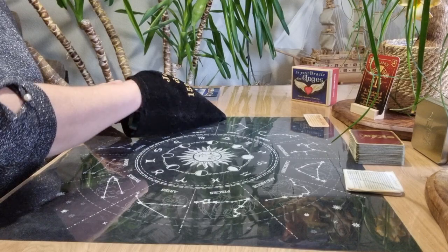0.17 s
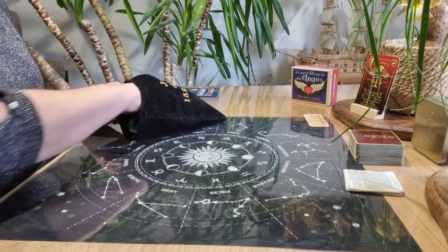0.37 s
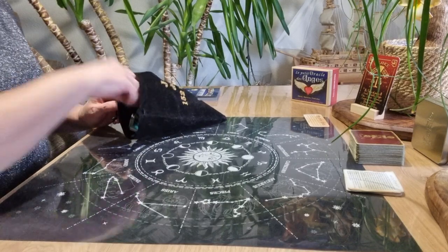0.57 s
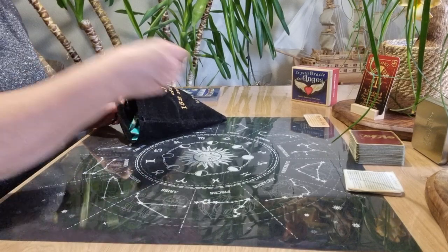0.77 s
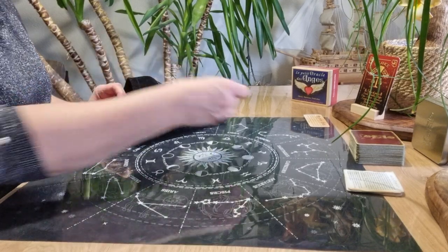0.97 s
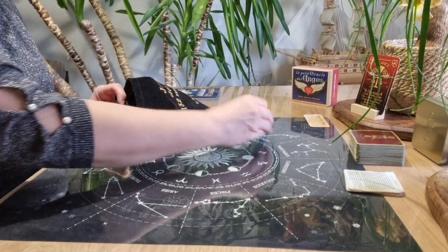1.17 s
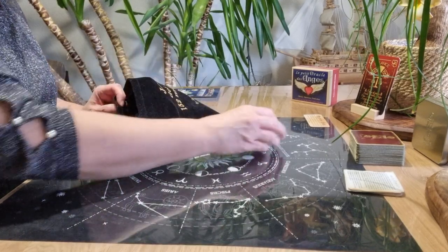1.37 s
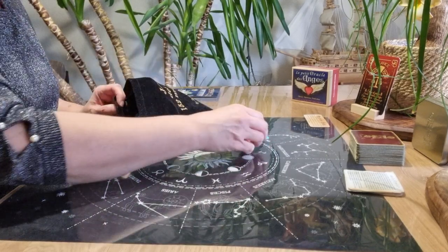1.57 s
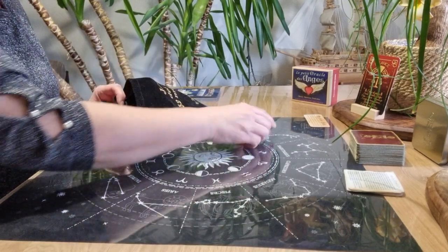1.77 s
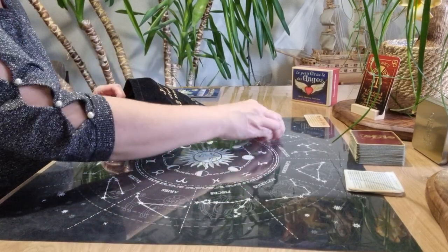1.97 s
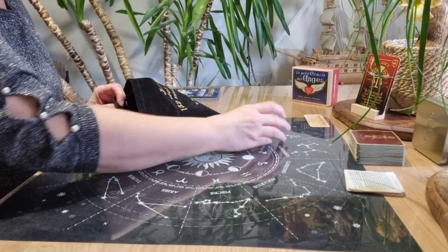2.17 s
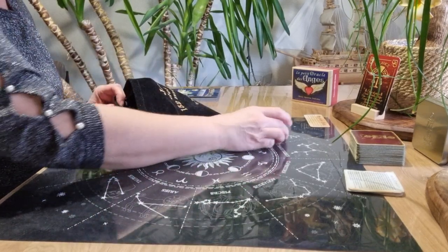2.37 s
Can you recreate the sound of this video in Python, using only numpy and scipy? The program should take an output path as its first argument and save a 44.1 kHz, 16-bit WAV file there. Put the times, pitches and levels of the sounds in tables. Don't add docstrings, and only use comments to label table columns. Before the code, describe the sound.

Small hard tokens click brightly in a cloth bag from 0 to 0.45 s, busiest at the start, with dull knocks and soft fabric rubbing. Faint cloth movement and a light bump near 0.87 s follow. At 1.3 s dull knocks lead into a loud, dry snap at 1.35 s, chattering briefly. Soft bumps and low table thuds come around 1.85-2.2 s, over quiet small-room hiss and low rumble.

```python
import sys
import numpy as np
from scipy import signal
from scipy.fft import rfft, irfft, next_fast_len
from scipy.io import wavfile
from scipy.ndimage import map_coordinates

SR = 44100
rng = np.random.default_rng(int(sys.argv[2]) if len(sys.argv) > 2 else 0)


def put_to_file(sound):
    columns = np.atleast_2d(sound).T
    safe = np.clip(columns, -1, 1)
    whole_steps = np.round(safe * 32767)
    wavfile.write(sys.argv[1], SR, whole_steps.astype(np.int16))


def boost_factor(decibels):
    exponent = np.asarray(decibels, float) / 20
    return 10 ** exponent


N = 106325


def along(points, hz, ends=None):
    point_hz, values = np.transpose(points)
    return np.interp(np.log(hz + 1), np.log(point_hz + 1), values, ends, ends)


def wobble(knots_per_s):
    knots = rng.standard_normal(int(N / SR * 40) + 4)
    return map_coordinates(knots, [np.arange(N) * knots_per_s / SR])


def noise(spectrum):
    m = next_fast_len(N + 8192)
    gain = boost_factor(along(spectrum, np.fft.rfftfreq(m, 1 / SR), -120))
    x = irfft(rfft(rng.standard_normal(m)) * gain, m)[:N]
    return x / np.sqrt(np.mean(x ** 2) + 1e-20)


def ring(modes, base_hz=1, detune=.015, attack_s=.00015):
    t = np.arange(SR // 10) / SR
    x = np.zeros(len(t))
    for hz, db, t60 in modes:
        level_luck, pitch_luck = rng.standard_normal(2)
        decay = boost_factor(db + 1.5 * level_luck - 60 * t / max(t60, .001))
        x += decay * np.sin(2 * np.pi * hz * base_hz * (1 + detune * pitch_luck) * t)
    return x * (1 - np.exp(-t / attack_s))


def add(x, start_s, piece):
    i = round(start_s * SR)
    x[i:i + len(piece)] += piece[:max(len(x) - i, 0)]


# frequency in Hz, reverberation time t60 in seconds.
ROOM_T60 = [(200, 0.27), (1200, 0.38), (3000, 0.25), (8000, 0.27), (15000, 0.2)]
# frequency in Hz, level in dB.
ROOM_TONE = [(200, 5), (700, 11), (1250, 4), (2150, 7.5), (2900, 9), (5500, 0.5), (8300, 2.5), (12000, 6.5)]


def room(hit, db):
    hz, t, z = signal.stft(rng.standard_normal(SR // 3), SR, nperseg=128)
    decay_db = -60 * t / along(ROOM_T60, hz)[:, None]
    z = z * boost_factor(along(ROOM_TONE, hz)[:, None] + decay_db)
    delay_s = .0015
    tail = np.pad(signal.istft(z, SR, nperseg=128)[1], (int(delay_s * SR), 0))
    tail = boost_factor(db) * tail / np.linalg.norm(tail)
    return signal.fftconvolve(hit, np.r_[1, tail])


# frequency in Hz, level in dB per Hz.
HISS = [(88, -32), (150, -5.5), (254, -2), (286, -8.5), (348, -6.5), (448, -10.5), (979, -14.5),
        (1060, -18), (16000, -29)]
# frequency in Hz, level in dB per Hz.
RUMBLE = [(25, -18), (40, 7.5), (52, -4), (68, -6.5), (85, -6), (130, -7.5), (200, -55)]
# frequency in Hz, level in dB per Hz.
HUM = [(200, -50.5), (245, 7), (262, 11), (280, 6), (330, -38)]


def background():
    rumble = boost_factor(2.5 * wobble(6)) * noise(RUMBLE)
    hiss = boost_factor(.4 * wobble(3)) * noise(HISS)
    return boost_factor(-60.5) * hiss + boost_factor(-62) * rumble + boost_factor(-81.5) * noise(HUM)


# middle in seconds, length in seconds, level in dB, low mode in Hz, upper mode's share in dB.
ROCKS = [(.035, 0.089, -46, 65.8, -16.5), (0.197, 0.13, -56.5, 55.3, -35), (0.373, 0.096, -51.5, 66.7, -15),
         (0.456, .1, -57, 58.8, -13), (0.71, 0.13, -60, 55.6, -12), (0.832, 0.16, -59.5, 57, -29),
         (1.061, 0.086, -57, 51.7, -8.5), (1.33, 0.084, -56, 62.8, 8), (1.451, .1, -57, 62.7, -17),
         (1.876, 0.056, -48, 77.5, -4.5), (1.959, .1, -41.5, 63.8, -16.5), (2.034, 0.054, -49.5, 54, -8.5),
         (2.103, 0.086, -51, 54.6, -9), (2.206, 0.098, -55, 57, -3), (2.365, 0.087, -53.5, 61, -8.5)]


def table_rocking():
    octave_db, upper_hz = -10.5, 264
    x = np.zeros(N)
    for middle, length, db, hz, upper_db in ROCKS:
        t = np.arange(int(length * SR)) / SR
        phase = 2 * np.pi * rng.random(3)
        swing = np.sin(2 * np.pi * hz * t + phase[0])
        swing += boost_factor(octave_db) * np.sin(2 * np.pi * 2 * hz * t + phase[1])
        swing += boost_factor(upper_db) * np.sin(2 * np.pi * upper_hz * t + phase[2])
        add(x, max(middle - length / 2, 0), boost_factor(db + 4) * np.sin(np.pi * t / length) * swing)
    return x


# frequency in Hz, level in dB per Hz.
CLOTH_DULL = [(200, -6), (500, -1), (1500, -1.5), (3000, -5.5), (4100, -5.5), (5500, -12), (8000, -18.5)]
# frequency in Hz, level in dB per Hz.
CLOTH_BRIGHT = [(3000, -16), (5800, -14), (7600, -0.5), (8500, -1), (10500, -8.5), (14000, -13),
                (16000, -21)]
# start in seconds, rise in seconds, fall in seconds, level in dB, brightness in dB.
STROKES = [(-.04, 0.056, 0.4, -53, -2.5), (0.172, 0.025, 0.083, -59.5, -2.5),
           (0.279, 0.03, 0.41, -58.5, -2), (.38, 0.074, 0.6, -94, 14), (0.509, 0.017, 0.088, -73.5, 14.5),
           (0.667, 0.016, 0.068, -62, 3.5), (.68, 0.036, 0.089, -68.5, -6.5),
           (0.799, 0.072, 0.13, -68.5, 3.5), (1.02, 0.061, 0.27, -75.5, 5.5),
           (1.84, 0.01, 0.43, -64.5, -3.5), (1.98, 0.049, 0.13, -70, -1), (2.2, 0.26, .3, -84, 7)]


def cloth():
    t = np.arange(N) / SR
    dull, bright = noise(CLOTH_DULL), noise(CLOTH_BRIGHT)
    x = np.zeros(N)
    for start, rise, fall, db, bright_db in STROKES:
        swell = np.clip((t - start) / rise, 0, 1) ** 2
        fade = boost_factor(-20 * np.clip(t - start - rise, 0, None) / fall)
        x += boost_factor(db) * swell * fade * (dull / boost_factor(bright_db) + bright * boost_factor(bright_db))
    return x * boost_factor(1.8 * wobble(35))


# frequency in Hz, level in dB, t60 in seconds.
BOARD = [(560, -43.5, 0.054), (990, -26.5, 0.013), (1030, -8, 0.044), (1228, -2.5, 0.047),
         (1513, 11.5, 0.011), (1800, 5, 0.012)]
# multiple of its pitch, level in dB, t60 in seconds.
KNOCK = [(.55, -10, .012), (.82, -5, .014), (1, 0, .018), (1.27, -4, .014), (1.65, -6, .009),
         (2.3, -11, .006)]
# frequency in Hz, level in dB, t60 in seconds.
TICK = [(2400, 0, .006), (3200, -1, .006), (4300, -4, .005)]
# start in seconds, peak in dB, pitch in Hz, room level in dB, tick level in dB.
KNOCKS = [(0.051, -37, 1670, 2, -8), (0.063, -32, 1423, -3.5, -4), (0.0702, -37, 1730, -9, 8),
          (0.0743, -38.5, 1860, -18, -11), (0.198, -38.5, 1800, 0.5, 4), (.347, -52, 840, -3, -1),
          (.4335, -50, 2120, 3, -20), (1.26, -54, 2340, -9, -3), (1.294, -31.5, 1240, 9, -10),
          (1.31, -40, 1090, -4, -22), (.882, -55.5, 1024, -7, -20), (0.8698, -38.5, 1000, -7, -10),
          (1.2828, -28, 1040, -4, -7), (1.8435, -46, 1000, -3, -2), (1.8697, -38, 1570, -8, -5),
          (2.1685, -49, 1000, -4, -2), (1.853, -44, 1640, -4, -15), (1.879, -43.5, 1460, 4, -20),
          (2.177, -43.5, 1304, -0.5, -10), (2.19, -45, 1600, -8, -15)]


def knocks():
    attack_s = .0005
    x = np.zeros(N)
    for start, db, hz, room_db, tick_db in KNOCKS:
        hit = ring(KNOCK, hz, detune=.03, attack_s=attack_s)
        hit += boost_factor(-12) * ring(BOARD, attack_s=attack_s)
        add(x, start, -room(boost_factor(db - 2) * hit, room_db - 0.5))
        add(x, start, -boost_factor(db + tick_db) * ring(TICK, attack_s=attack_s))
    return x


def tokens(contacts, body, edge, knock_db, crack_db, room_db=None):
    x, t = np.zeros(N), np.arange(SR // 10) / SR
    crack_band = signal.butter(2, (2360, 14200), "bandpass", fs=SR, output="sos")
    crack_t60 = .006
    for start, db, body_db, edge_db, hz in contacts:
        burst = boost_factor(crack_db - 60 * t / crack_t60) * rng.standard_normal(len(t))
        crack = signal.sosfilt(crack_band, burst)
        hit = boost_factor(body_db) * ring(body, hz, attack_s=.0003)
        hit += boost_factor(edge_db) * (ring(edge) + crack)
        hit += boost_factor(knock_db) * ring(BOARD, attack_s=.0012)
        hit *= boost_factor(db)
        add(x, start, hit if room_db is None else room(hit, room_db))
    return x


# multiple of body pitch, level in dB, t60 in seconds.
FLAT_BODY = [(1, 0, .004), (1.4, -8, .003), (.68, -6, .004), (.14, -16, .015)]
# frequency in Hz, level in dB, t60 in seconds.
FLAT_EDGE = [(6520, 3.5, 0.0015), (7450, 3, 0.0027), (8210, 3.5, 0.004), (9120, -6, 0.003),
             (12400, -15, 0.0023)]
# start in seconds, peak in dB, body mode in dB, edge mode in dB, body pitch in Hz.
SNAPS = [(1.3186, -39, 0, -9, 4200), (1.3451, -8, 0, -12, 4000), (1.3463, -12, -2, -5, 4000),
         (1.3506, -12.5, -16, 0, 3800), (1.3530, -12, -10, 0, 4200), (1.3539, -14, -16, 0, 4000),
         (1.3567, -19, -9, 0, 3600), (1.3586, -14, -10, 0, 4200), (1.3595, -14, -16, 0, 4000),
         (1.3835, -26, -16, 0, 4000), (1.4005, -24, -9, 0, 4000), (1.4045, -29, -9, 0, 4000)]


def mat_token():
    return tokens(SNAPS, FLAT_BODY, FLAT_EDGE, knock_db=-16.5, crack_db=-8, room_db=-2)


def jostle(count=90):
    touches_per_s, fade_db_per_s, end_s = 160, 32, .4
    luck = rng.random((count, 4))
    start = np.cumsum(2 * luck[:, 0]) / touches_per_s
    db = -47.5 - fade_db_per_s * start + 12 * (luck[:, 1] - .5)
    db -= 99 * (start > end_s)
    edge_db = -2.5 - 14 * luck[:, 2]
    hz = 3600 + 500 * luck[:, 3]
    return np.c_[start, db, 0 * start, edge_db, hz]


# multiple of body pitch, level in dB, t60 in seconds.
BODY = [(1, 0, .011), (.9, -6, .009), (.6, -9, .006), (1.25, -7, .004)]
# frequency in Hz, level in dB, t60 in seconds.
EDGE = [(7850, 0, .012), (8400, -1, .01), (10000, -7, .005), (12800, -9, .005), (14600, -12, .004)]
# start in seconds, peak in dB, body mode in dB, edge mode in dB, body pitch in Hz.
CLICKS = [(0.0345, -42, 0, -18, 3760), (0.0375, -34, -1, 0.5, 3940), (0.0405, -32, 1, -14, 3850),
          (0.0454, -41, -10, -2, 3830), (0.0535, -35, 7, -15, 4070), (0.0556, -22, -2, -11.5, 4050),
          (0.0635, -33.5, -6.5, -10, 4040), (0.0685, -35, -2, -15, 3500), (0.0712, -42.5, -4, 0, 3860),
          (0.0895, -39, -5, -16, 3900), (0.1058, -43, -5, -3.5, 4300), (0.1497, -38.5, -5, -5, 3570),
          (0.1798, -36.5, 4, 3, 3750), (0.189, -28, -3, -13.5, 4280), (0.1935, -38.5, -14, -13, 3920),
          (0.2015, -37, -1, -8, 3520), (0.2065, -35, 4, -24, 3950), (0.2125, -55, 13, -7.5, 4000),
          (0.2547, -55, 7, -10, 3700), (0.303, -42.5, -1, -7, 3800), (.314, -51, -3, -6, 3900),
          (.329, -47, 1, -6, 3700), (.345, -47, 3, -7, 3730), (0.3716, -35.5, -2, -15, 3900),
          (.378, -52, 9, -16, 3770), (0.4335, -35, -0.5, -33, 3630), (0.4453, -49, 7, -24, 3700)]


def bag_tokens():
    clicks = tokens(CLICKS, BODY, EDGE, knock_db=-22.5, crack_db=-5, room_db=-3.5)
    patter = tokens(jostle(), BODY, EDGE, knock_db=-22.5, crack_db=-5)
    return clicks + patter


def scene():
    contacts = bag_tokens() + mat_token() + knocks()
    return (contacts + cloth() + table_rocking() + background())[None]


def top_cut(x):
    return signal.sosfilt(signal.butter(12, 16540, fs=SR, output="sos"), x)


def record(dry):
    low_cut_hz, top_hz = 43, 15850
    m = next_fast_len(N)
    hz = np.fft.rfftfreq(m, 1 / SR)
    gain = (hz < top_hz) / (1 + (low_cut_hz / (hz + 1)) ** 6)
    mix = irfft(rfft(dry, m) * gain, m)[:, :N]
    return top_cut(mix)


dry = scene()
out = record(dry)
put_to_file(out)
```